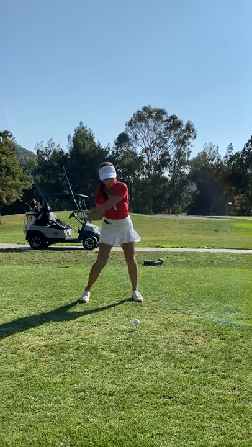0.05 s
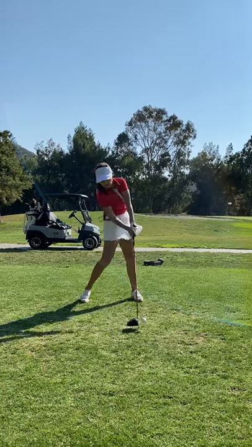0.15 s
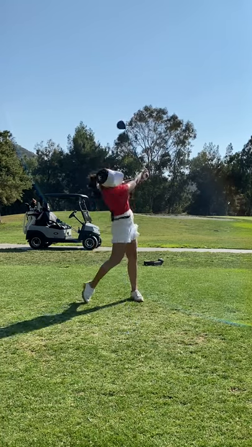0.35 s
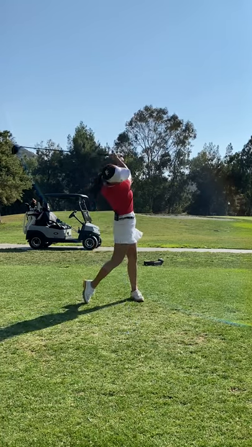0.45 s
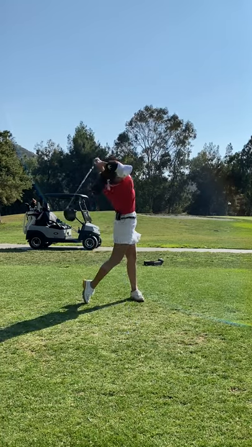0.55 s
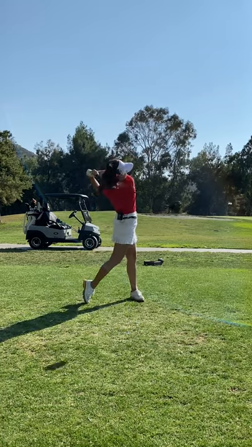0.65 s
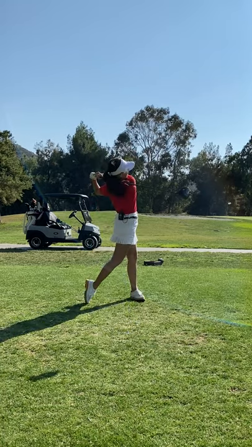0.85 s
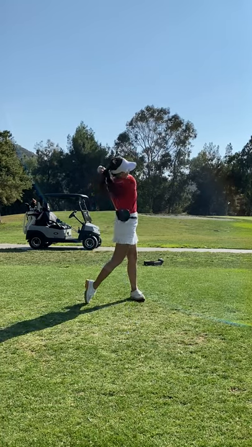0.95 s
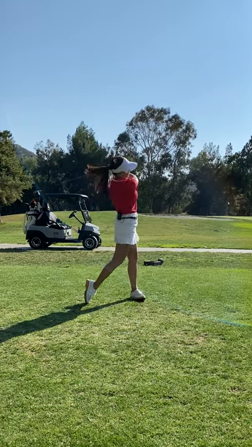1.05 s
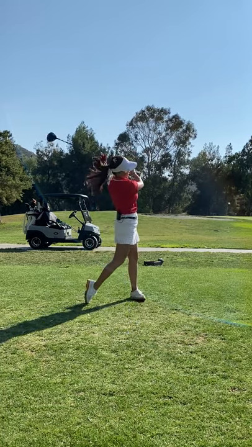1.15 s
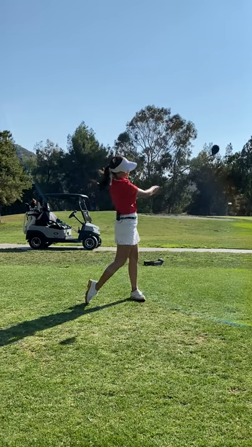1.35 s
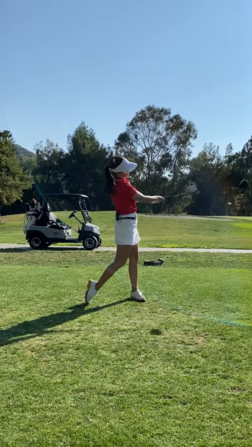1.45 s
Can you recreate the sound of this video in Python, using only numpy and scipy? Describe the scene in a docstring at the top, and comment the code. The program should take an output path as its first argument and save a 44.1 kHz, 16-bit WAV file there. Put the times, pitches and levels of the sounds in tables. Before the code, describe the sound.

A golf driver hits a ball with a sharp metallic crack, just after a quick whistling swish. The club head rings briefly and trees return a faint echo. Heard from a few metres away, over soft distant traffic and light air.

```python
"""A golf drive on an open course, a few metres away. Over a bed of distant rumble the shaft swishes up
to speed and air whistles across the hollow club head. The face cracks against the ball, the metal
rings over a dull knock, and the recorder's gain ducks briefly. The turf scatters a short bright tail,
a line of trees throws the blow back, and the far traffic and light air carry on."""
import sys
import numpy as np
from scipy import signal
from scipy.fft import rfft, irfft
from scipy.io import wavfile
from scipy.ndimage import uniform_filter1d

SR = 44100
rng = np.random.default_rng(int(sys.argv[2]) if len(sys.argv) > 2 else 0)


def store_pcm(level_fs):
    """Save levels as 16-bit WAV."""
    pcm = np.round(np.clip(level_fs, -1, 1) * 32767).astype(np.int16)
    wavfile.write(sys.argv[1], SR, np.atleast_2d(pcm).T)


N = 66150
T, HZ = np.arange(N) / SR, np.fft.rfftfreq(N, 1 / SR)

# attack, the crack of ball on face: f/Hz, relative level/dB
CRACK = [(100, -26.5), (600, -17), (950, -1.5), (1500, -1), (2050, -5.5), (3200, -15.5), (5000, -10),
         (6200, 7), (7500, -9.5), (9500, -7.5), (12300, -13.5), (14200, -3.5), (15200, -24)]
# dense upper ringing of head and shaft: f/Hz, relative level/dB
CLANG = [(100, -10.5), (300, -8), (900, -11), (1700, -9), (3000, -9), (4200, 3.5), (5000, -9.5),
         (6200, -8.5), (9000, -2), (12000, -2.5), (14300, -6), (15200, -26)]
# body, the dull knock of ball and tee: f/Hz, level/dB, t60/s
KNOCK_MODES = [(75, -27.5, 0.15), (180, -23, .035), (332, -17, .022), (516, -24, .07)]
# metallic ring of the club head: f/Hz, level/dB, t60/s
HEAD_MODES = [(1449, -18.5, .007), (2407, -22, 0.047), (3000, -33.5, 0.13), (2950, -21, 0.024),
              (3800, -27, .025), (4233, -9, .045), (5470, -28, 0.098), (5830, -20.5, 0.051),
              (6180, -24, 0.055), (6500, -25, .04), (6850, -32.5, .03), (7570, -28.5, 0.051),
              (8465, -27.5, .04), (9807, -31.5, .06)]
# eddies off the shaft as it speeds up and passes: t/s, f/Hz, level/dB
SWISH = [(.14, 558, -69), (.162, 600, -49), (.18, 674.5, -42.5), (.204, 766.5, -39), (.211, 798.6, -28),
         (.228, 795.5, -31), (.238, 770, -35), (.25, 720, -54), (.27, 601.4, -71.5)]
# broad rush of air round the club: f/Hz, relative level/dB
AIR = [(60, 0.5), (300, -0.5), (1000, -6.5), (1600, -10.5), (2400, -15.5), (6000, -23), (10000, -28),
       (12000, -43.5), (15000, -64)]
# whistle of the head, falling as it passes: t/s, f/Hz, level/dB
WHISTLE = [(0.208, 4420, -70.5), (.222, 4380, -53), (.231, 4330, -23), (0.244, 4272, -24),
           (.259, 4260, -32.5), (.268, 4130, -31.5), (.276, 4105, -24.5), (.29, 4110, -29.5),
           (.3, 4090, -47), (.315, 4080, -47.5)]
# bright scatter off the grass: f/Hz, relative level/dB
GRASS = [(200, -6.5), (550, -8), (1100, -18), (2400, -6), (3500, -9.5), (4300, 13.5), (4900, -5.5),
         (6200, -4), (9500, -7.5), (11000, -17.5), (14000, -36)]
# echo envelope from cart and trees: delay t/s, relative level/dB
ECHOES = [(.03, -23), (.1, -15.5), (.13, -11.5), (.147, 4.5), (.17, -8), (.19, 1), (.235, 0.5), (.27, -8.5),
          (.32, -17), (.4, -27), (.6, -37.5), (1.2, -60)]
# EQ on the echoes: f/Hz, level/dB
ECHO_EQ = [(100, -4.5), (400, 0.5), (850, 4.5), (1500, -1.5), (2100, -0.5), (3400, -5.5), (3900, -8.5),
           (4100, -1), (4300, -7.5), (5000, -1), (6400, 0), (9800, -9), (11000, -28), (15000, -59)]
# bed of distant rumble and leaves: f/Hz, relative level/dB
COURSE = [(12, -33), (25, -11), (38, -5.5), (55, 1.5), (110, -2), (160, -6), (280, -12.5), (500, -14.5),
          (800, -13), (1200, -19), (2000, -29), (4200, -32.5), (4900, -37.5), (6400, -37.5), (9000, -46.5),
          (10500, -57), (12000, -77), (16000, -90)]
# slow rise and fall of the wind rumble in the bed's bass: t/s, level/dB
RUMBLE_LEVEL = [(0, -3.5), (.4, -3), (.75, 1.5), (1.15, 1.5), (1.45, 1)]
# stereo image of the diffuse field: f/Hz, coherence/1, left-right level/dB
DIFFUSE = [(30, 1, -2), (70, 1, 0.5), (130, 1, 1.5), (260, 0.47, 1.5), (500, .58, 4), (1000, .45, -0.5),
           (2000, 0.64, 1.5), (3300, 0.52, -1), (6500, .38, -.5), (10000, .7, 0.5), (13000, 1, -1.5)]
# the two microphone ports: f/Hz, left-right level/dB, left phase lead/rad
PORTS = [(40, -2, 0), (110, .5, -0.7), (270, 5, -0.4), (550, 8, -0.07), (1100, 5, -1.17), (1700, 2.5, .4),
         (2400, -3, 0.89), (3304, -4, 1.48), (4200, -5.5, 1.87), (5280, 0.5, 2.06), (6100, 0, 0.5),
         (8886, -0.5, 1.88), (11500, 0, 2), (13500, -1.5, 3.5)]

STRIKE_S, TURF_DELAY_S, TURF_DB = .239, .0029, 1.5


def strike(contact_s=.001, crack_fall_s=.0003, clang_rise_s=.0041, knock_delay_s=.0022):
    """Face hits ball: a millisecond of crack, then a dense clang and a low knock."""
    age = T - STRIKE_S
    crack_envelope = (age > 0) * np.exp(-np.maximum(age - contact_s, 0) / crack_fall_s)
    crack = amp(-1.5) * noise(CRACK) * crack_envelope
    clang_envelope = np.clip(age / clang_rise_s, 0, 1) * decay(age - clang_rise_s, t60=.025)
    clang = amp(-7.5) * noise(CLANG) * clang_envelope
    return crack + clang + ring(KNOCK_MODES, STRIKE_S + knock_delay_s)


def head():
    """The hollow metal head rings, heard directly and off the turf."""
    return ring(HEAD_MODES, STRIKE_S) + amp(TURF_DB) * ring(HEAD_MODES, STRIKE_S + TURF_DELAY_S)


def swish(air_db=-8, spread=.6):
    """Shaft eddies rise in pitch and level with speed; returns the direct swish and a wide air layer."""
    phasor, level = glide(SWISH)
    air = level * amp(air_db) * np.array([noise(AIR) for _ in range(3)])
    eddies = level * unit((phasor * wander(width_hz=120)).real)
    return eddies + air[0], spread * air[1:]


def whistle(doppler, breath=.3):
    """Air sings over a hollow in the head: a breathy tone, its pitch scaled by doppler."""
    phasor, level = glide([(t, hz * doppler, db) for t, hz, db in WHISTLE])
    flutter = 1 + breath * wander(width_hz=470)
    return level * unit((phasor * flutter).real)


def grass():
    """The ground nearby scatters a short bright tail with a faint lingering hiss."""
    age = T - STRIKE_S - TURF_DELAY_S
    fade = amp(-16) * decay(age, t60=.0746) + amp(-39) * decay(age, t60=.85)
    return np.array([noise(GRASS), noise(GRASS)]) * fade * (age > 0)


def trees(send, return_db=-23):
    """Countless faint reflections, strongest from the tree line."""
    delay, db = np.transpose(ECHOES)
    taps = rng.standard_normal((2, N)) * amp(np.interp(T, delay, db)) * (T > delay[0])
    taps /= np.linalg.norm(taps[0])
    echo = signal.fftconvolve(send[None], taps, axes=1)[:, :N]
    return amp(return_db) * equalise(echo, ECHO_EQ)


def course(bed_db=-47, swell_db=.54, crossover_hz=148.3):
    """Far traffic and light air, gently swelling, with a rumble that comes and goes."""
    bed = np.array([noise(COURSE), noise(COURSE)])
    bed *= amp(bed_db + swell_db * unit(wander(width_hz=5).real))
    bass = irfft(rfft(bed) / (1 + (HZ / crossover_hz) ** 4), N)
    ride = amp(np.interp(T, *np.transpose(RUMBLE_LEVEL)))
    return bed - bass + bass * ride


def diffuse(pair):
    """Blends two unrelated signals into a field that arrives from many sides."""
    mid, side = rfft(pair)
    coherence = np.clip(curve(DIFFUSE), 0, 1)
    tilt = amp(curve(DIFFUSE, column=2) / 2)
    side = side * np.sqrt((1 - coherence) / (1 + coherence))
    stereo = np.array([(mid + side) * tilt, (mid - side) / tilt])
    return irfft(stereo * np.sqrt((1 + coherence) / 2), N)


def ports(near, far):
    """The two microphone ports favour the near sound unequally and shift the phase of everything."""
    tilt = amp(curve(PORTS) / 2)
    lead = np.exp(1j * curve(PORTS, column=2) / 2)
    stereo = rfft(near) * np.array([tilt, 1 / tilt]) + rfft(far)
    return irfft(stereo * np.array([lead, 1 / lead]), N)


def amp(db):
    """Decibels to gain."""
    return 10 ** (np.asarray(db) / 20)


def unit(x):
    """Normalises to rms 1."""
    return x / np.sqrt(np.mean(abs(x) ** 2) + 1e-20)


def curve(table, column=1):
    """One column of a table, interpolated over log frequency."""
    rows = np.array(table)
    return np.interp(np.log(HZ + 1), np.log(rows[:, 0] + 1), rows[:, column])


def equalise(x, eq):
    """Applies an EQ curve of f/Hz, level/dB."""
    return irfft(rfft(x) * amp(curve(eq)), N)


def noise(eq):
    """Noise coloured by an EQ curve, rms 1."""
    return unit(equalise(rng.standard_normal(N), eq))


def wander(width_hz):
    """Smooth random complex modulator, rms 1."""
    white = rng.standard_normal((2, N))
    real, imag = irfft(rfft(white) / (1 + (2 * HZ / width_hz) ** 2), N)
    return unit(real + 1j * imag)


def glide(rows):
    """Complex oscillator and gated envelope following t/s, f/Hz, level/dB."""
    t, hz, db = np.transpose(rows)
    phasor = np.exp(2j * np.pi * np.cumsum(np.interp(T, t, hz)) / SR)
    return phasor, amp(np.interp(T, t, db)) * (T > t[0]) * (T < t[-1])


def decay(age, t60):
    """Envelope that falls 60 dB in t60 seconds."""
    return np.exp(-np.log(1000) * np.maximum(age, 0) / t60)


def ring(modes, start_s):
    """Damped modes struck together."""
    age = np.maximum(T - start_s, 0)
    return sum(amp(db) * decay(age, t60) * np.sin(2 * np.pi * hz * age) for hz, db, t60 in modes)


def scene():
    """The mix: swing and blow up close; air, tails and the open course spread wide."""
    shaft, air = swish()
    blow = shaft + strike()
    echo = trees(blow + amp(8.5) * whistle(doppler=.96))  # the receding head echoes lower in pitch
    near = blow + head() + whistle(doppler=1)
    far = diffuse(air + grass() + echo + course())
    return ports(near, far)


def record(dry, low_cut_hz=46, threshold_db=-24.5, duck_db_per_db=.29, release_db_per_s=59.5):
    """Low cut, gain control that ducks at the blow, soft clipping, then a high cut."""
    dry = signal.sosfilt(signal.butter(2, low_cut_hz, "high", fs=SR, output="sos"), dry)
    power = uniform_filter1d((dry ** 2).mean(0), size=128)
    power_db = 10 * np.log10(abs(power) + 1e-12)
    release_db = T * release_db_per_s
    detector_db = np.maximum.accumulate(power_db + release_db) - release_db  # jumps up, sinks steadily
    duck_db = duck_db_per_db * np.maximum(detector_db - threshold_db, 0)
    clipped = np.tanh(dry / amp(duck_db))
    high_cut = signal.firwin(255, 16000, window=("kaiser", 9), fs=SR)
    return signal.oaconvolve(clipped, high_cut[None], "same")


dry = scene()
out = record(dry)
store_pcm(out)
```